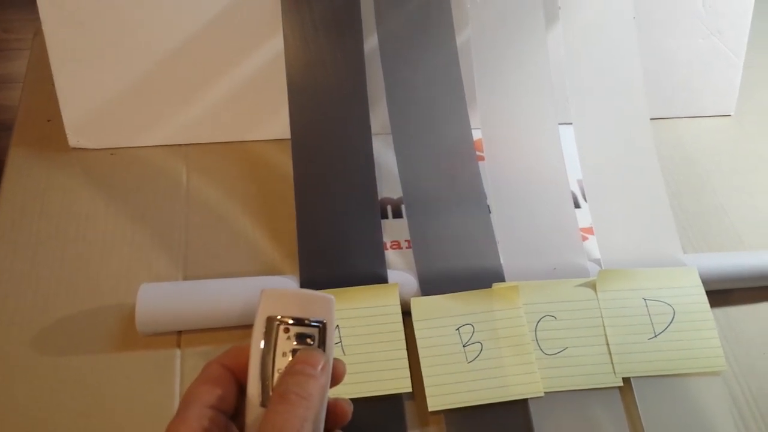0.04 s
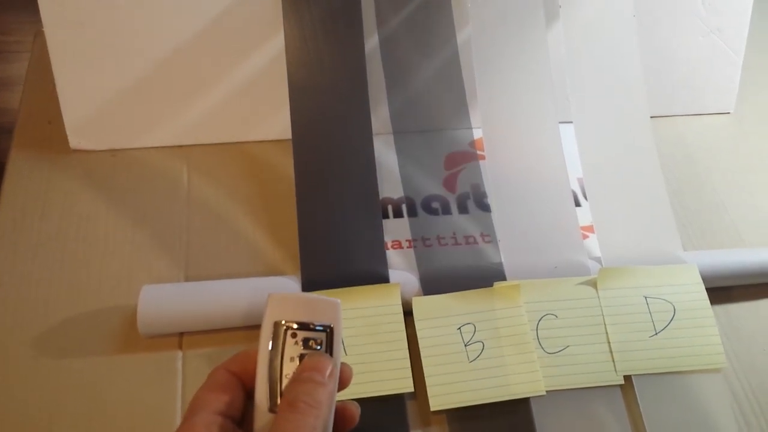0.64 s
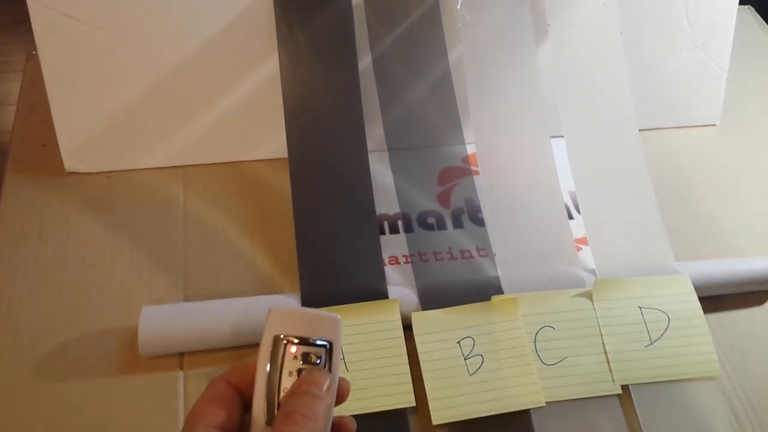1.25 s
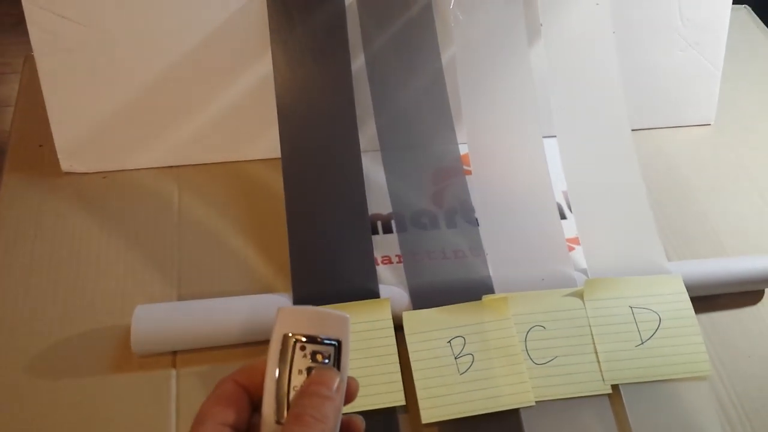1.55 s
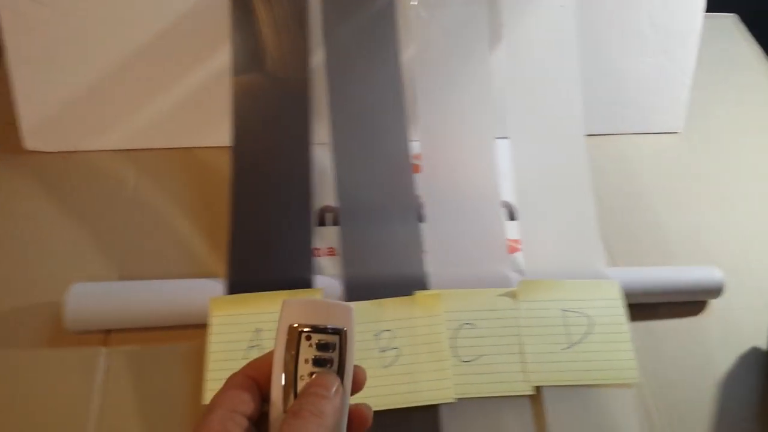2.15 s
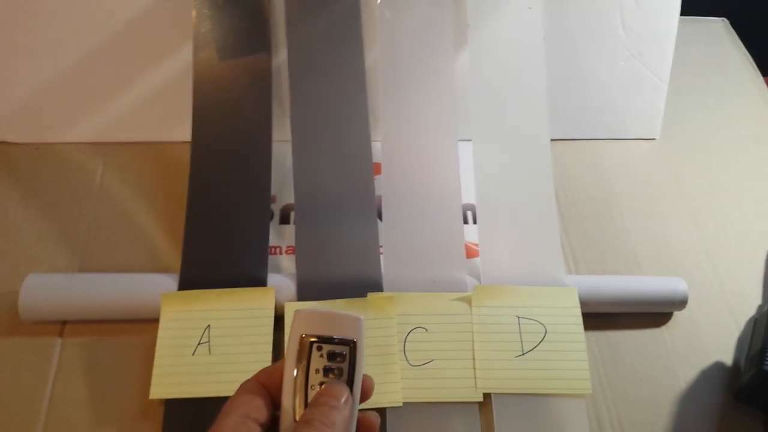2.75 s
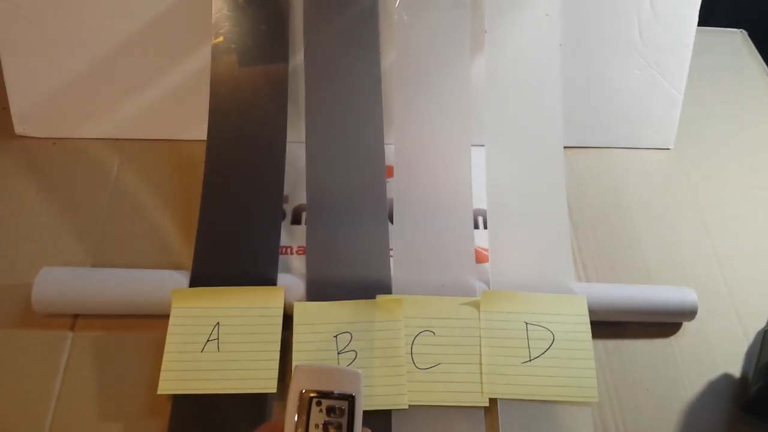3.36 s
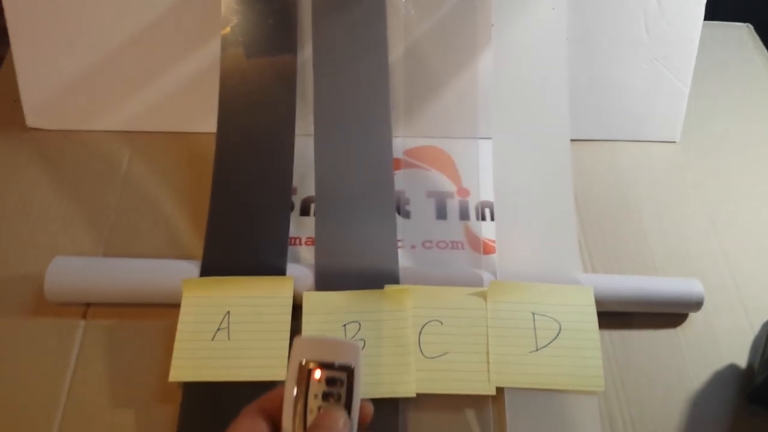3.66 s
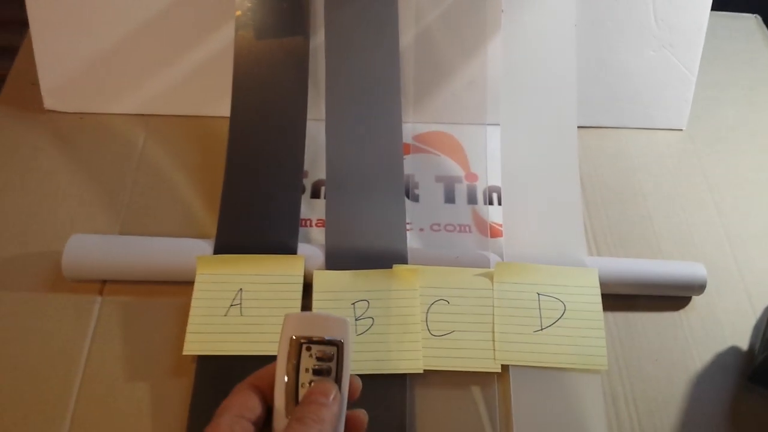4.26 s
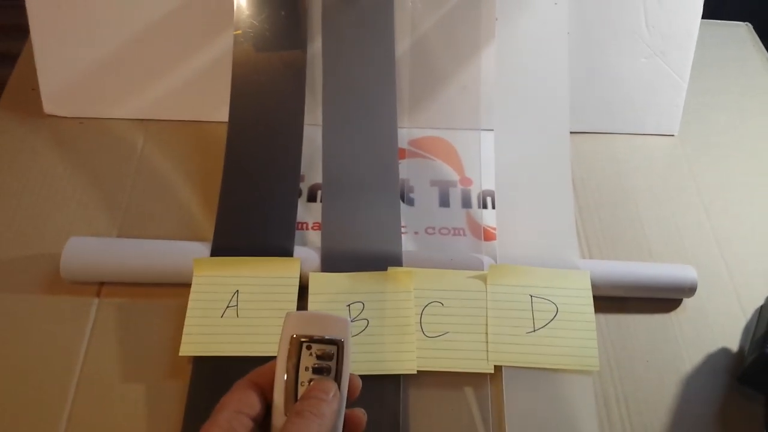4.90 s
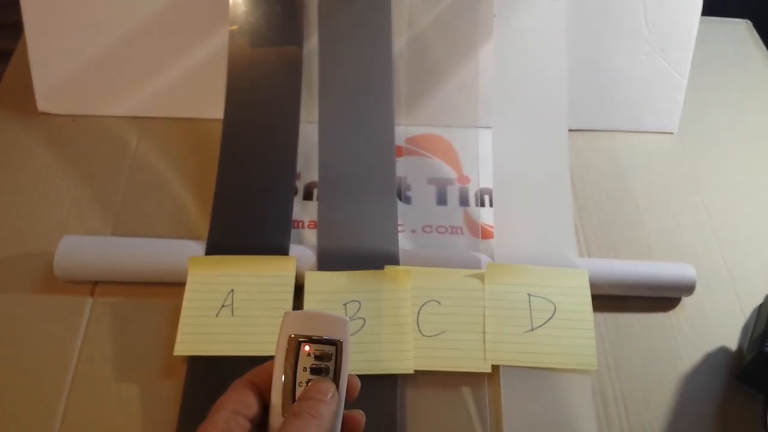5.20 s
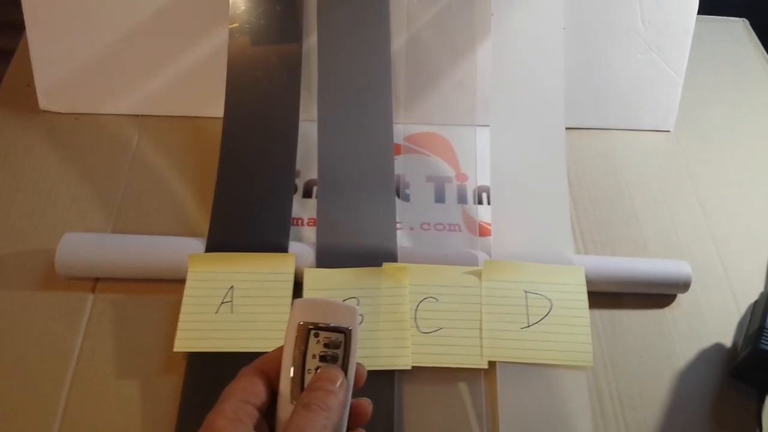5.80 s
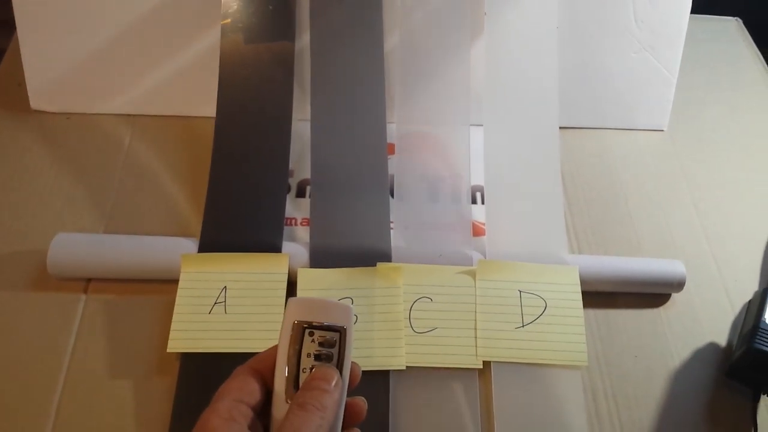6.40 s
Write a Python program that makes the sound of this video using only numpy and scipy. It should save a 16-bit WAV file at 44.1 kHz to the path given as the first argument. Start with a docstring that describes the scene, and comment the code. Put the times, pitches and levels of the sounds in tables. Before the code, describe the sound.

Four close plastic button clicks, each answered by a switching relay, with soft hand bumps and rubbing in a quiet room.

```python
"""Remote and relay in a quiet room

Close to the microphone, a thumb presses a small remote four times; its dome snaps and ticks back up.
About 60 ms after each press a relay closes or opens with a short chatter and rings in its case.
Hands tick, bump and rub on plastic; further off something hollow is nudged, and later a click echoes.
Behind it lie room noise and faint mains hum; a low tone near 300 Hz swells briefly after each throw."""
import sys
import numpy as np
from scipy import signal
from scipy.fft import rfft, irfft
from scipy.io import wavfile
from scipy.ndimage import uniform_filter1d

SR = 44100
rng = np.random.default_rng(int(sys.argv[2]) if len(sys.argv) > 2 else 0)


def dump(signal):
    """Clip the signal to [-1, 1] and save it as 16-bit WAV at the path in sys.argv[1]."""
    limited = np.clip(np.atleast_2d(signal).T, -1, 1)
    pcm = np.round(limited * 32767).astype(np.int16)
    wavfile.write(sys.argv[1], SR, pcm)


N = 288414
EVENT_SAMPLES = 32768
T = np.arange(EVENT_SAMPLES) / SR
HZ = np.fft.rfftfreq(EVENT_SAMPLES, 1 / SR)


# Presses, close to the microphone. Each row: start in seconds, level in dB, tilt in dB per octave.
PRESSES = [(.2030, 0.5, -1.2), (1.3347, 2.5, -0.8), (3.5249, -2, -2.5), (5.3135, -2, -2)]
# The remote's shell. Each row: frequency in Hz, left and right gain in dB.
SHELL_COLOUR = [(148.8, -23, -26), (494.7, -24, -27.5), (920, -22, -15.5), (1330, -3, -14),
                (1862, 2.5, -13), (2246, -4.5, -13.5), (3230, -17.5, -10), (4380, 3.5, 5), (5087, 5, -11),
                (6180, 12, 4.5), (7300, -7, -10), (9140, -11.5, -4), (10800, -21.5, -16.5),
                (14160, -28.5, -25)]

def button(level_db, tilt_db, snap_db=-5, rattle_db=-2, table_db=-17, room_db=-15):
    """The dome snaps once; the shell rattles, and the table and room throw it back."""
    shell_db = np.array([curve(SHELL_COLOUR, HZ, column) for column in (1, 2)])
    snap = (T == 0) * from_db(snap_db) + from_db(rattle_db) * chatter(0.00074, 0.013)
    echo = from_db(table_db) * chatter(0.0027, 0.06) + from_db(room_db) * room()
    echo = ring(echo, -0.51 * shell_db.mean(axis=0))  # over all directions the shell's peaks even out
    return radiate(snap, echo, shell_db + level_db + tilt_db * np.log2((HZ + 500) / 5000))


# One throw per press; the armature never lands twice alike. Each row: level in dB, tilt in dB per
# octave, then Hz and relative dB for each of the ringing wall, a favoured band and a starved band.
THROWS = [(0.5, 1.5, 1425, 2.5, 4200, 11.5, 6600, -6), (1.5, 1.35, 1438, 12, 1400, 3, 5800, -11),
          (-0.5, 0.2, 5300, 5, 7200, 4, 8200, -7), (0, -0.43, 1230, 1, 513, 8.5, 1730, -5.5)]
# A sharp closing stroke, then a longer opening one. Each row: delay after the press, chatter rise
# and chatter t60 in seconds, swell of the background tones in dB.
STROKES = [(.061, .002, 0.012, 12.5), (.0592, 0.002, 0.074, 7.5)]
# The strokes' colour. Each row: frequency in Hz, closing and opening gain in dB.
STROKE_COLOUR = [(200, -2, -1), (520, -3, 0), (1100, -7.5, 1), (1800, -3, -1.5), (3500, 0, -2.5),
                 (6000, 0, -2), (8400, -0.5, -4.5), (13100, 4, -3)]
# The relay and its case. Each row: frequency and nominal width in Hz, left and right level in dB.
RELAY_MODES = [(470, 220, -9, -13.5), (1224, 100, 7.5, -3), (1440, 290, 6, -11), (1558, 390, 9.5, -2.5),
               (1795, 200, 7.5, -2.5), (2476, 51, 3.5, -1), (3010, 90, 0, -3.5), (3470, 310, -5.5, -2),
               (4217, 170, -0.5, -3), (4878, 240, 2.5, -3.5), (5394, 160, 12.5, -5.5),
               (5990, 180, 14, -4.5), (6240, 190, 8.5, -3.5), (6710, 350, 4, 10.5), (7750, 150, 9.5, -1),
               (7540, 240, 4, -5), (8240, 224, -2, 13.5), (8920, 340, 7, -2), (9000, 130, 1, 6.5),
               (9530, 1000, -6, -1.5), (10800, 400, -3, -10), (12030, 280, -12.5, -6.5),
               (12550, 180, -10, -1.5), (13100, 220, -4.5, -4.5), (13600, 300, -11.5, -9.5)]

def relay(stroke, level_db, tilt_db, wall_hz, wall_db, favoured_hz, favoured_db, starved_hz, starved_db):
    """The armature strikes and chatters; the modes ring, and one wall of the case sings on."""
    _, rise, t60, _ = STROKES[stroke]
    table_echo = ring(chatter(0.0058, 0.087), dull(8000) - 9)
    room_echo = ring(room(), dull(11500) - 4.5 + sides(1.5))
    landing_db = level_db + tilt_db * octaves(4000)
    landing_db += favoured_db * peak(favoured_hz, 0.14) + starved_db * peak(starved_hz, 0.14)
    colour_db = resonances(RELAY_MODES, floor_db=-16) + colour(STROKE_COLOUR, 1 + stroke) + landing_db
    strike = radiate(chatter(rise, t60) + table_echo, room_echo, colour_db)
    wall = np.sin(2 * np.pi * wall_hz * T) * envelope(rise=0.0024, t60=0.33)
    return strike + wall * from_db(wall_db - 55.5 + sides(16))


def throw_times():
    """Start in seconds and stroke of each throw: the relay closes (0) and opens (1) in turn."""
    return [(press[0] + STROKES[k % 2][0], k % 2) for k, press in enumerate(PRESSES)]


# The button comes back up. Each row: start in seconds, level in dB, tilt in dB per octave.
RELEASES = [(.3945, -9, -1.5), (1.5204, -9.5, -0.5), (3.7902, -13, -2), (5.5228, -23.5, 1.5)]
# Its tick, duller than the press. Each row: frequency in Hz, gain in dB.
RELEASE_COLOUR = [(200, -10), (600, -10), (1100, -2), (1700, 1), (3200, -13.5), (6000, -3), (8000, -12.5),
                  (13000, -20.5)]

def release(level_db, tilt_db):
    """The dome springs back under the thumb."""
    colour_db = colour(RELEASE_COLOUR) + level_db + tilt_db * octaves(1500)
    return contact(colour_db, t60=0.016, room_db=-12.5, pan_db=4)


# Plastic ticks in the hand, and at 4.215 s a click further off with much room echo. Each row: start in
# seconds, level in dB, ring in Hz, its half width in octaves, relative click and room levels in dB.
TICKS = [(.1546, -29, 1450, .3, -33.5, -6), (1.2652, -33, 1390, .4, -14, 3),
         (1.8317, -19.5, 1100, 0.33, -23, -2), (1.8554, -29.5, 3000, 1.34, -27, -6.5),
         (1.8671, -21.5, 1500, 0.52, -25, -22), (3.7215, -18, 6000, 0.16, -19, -6),
         (3.8418, -14.5, 6500, 0.15, -22.5, -11), (3.8500, -30.5, 2120, 0.83, -18, -1),
         (4.2150, -17, 5630, 0.27, -11.5, 5.5), (4.2813, -10.5, 3000, 0.3, -30, -16),
         (5.2897, -19, 1505, 0.29, -25, 0)]

def tick(level_db, ring_hz, half_width, click_db, room_db):
    """A tick with one broad resonance over a faint even click."""
    colour_db = level_db + 20 * np.log10(peak(ring_hz, half_width) + from_db(click_db))
    return contact(colour_db, t60=0.012, room_db=room_db, pan_db=2.5)


# Bumps of the hand on the camera, and at 4.215 s the dull low body of the far click.
# Each row: start in seconds, knock and boom levels in dB.
BUMPS = [(1.6362, -6, 6), (1.7980, -39, -5.5), (2.2264, -15.5, -43), (2.3767, -4, -9.5), (3.9834, -11, -24),
         (4.2150, -16.5, -29)]
# The dull knock. Each row: frequency in Hz, gain in dB.
KNOCK_COLOUR = [(200, -1.5), (550, -6), (1500, -24.5), (3000, -35), (6000, -29), (11000, -44)]

def bump(knock_db, boom_db, boom_hz=152.6):
    """A short dull knock and the longer, low boom of the body that was hit."""
    boom = contact(boom_db + 20 * np.log10(peak(boom_hz, 0.53)), t60=0.23, room_db=-14, pan_db=1)
    knock = contact(colour(KNOCK_COLOUR) + knock_db, t60=0.033, room_db=-16.5, pan_db=3)
    return boom + knock


# Skin slides over plastic twice; the last row is just a faint, soft rustle that dies away.
# Each row: start, rise and t60 in seconds, level in dB.
RUSTLES = [(1.642, 0.0035, 0.89, -19), (2.74, 0.15, 1.14, -24), (5.54, .06, 0.76, -26)]
# Their soft colour. Each row: frequency in Hz, gain in dB.
RUSTLE_COLOUR = [(200, 1), (600, 2.5), (1600, 0), (2900, -8.5), (6000, -2.5), (11000, -12)]

def rustle(rise, t60, level_db):
    """A long run of tiny contacts that dies away."""
    return contact(colour(RUSTLE_COLOUR) + level_db, t60=t60, room_db=-8.5, pan_db=2, rise=rise)


# A nudge, further from the microphone. Each row: start in seconds, level in dB.
NUDGES = [(2.7013, -4)]
# The hollow object. Each row: frequency and nominal width in Hz, left and right level in dB.
HOLLOW_MODES = [(320, 63, -7, -10), (1490, 360, -11, -20), (1840, 140, -7.5, -15), (2920, 200, -22, -26),
                (3630, 500, -20, -37), (6100, 400, -19.5, -33)]

def nudge(level_db, room_db=6):
    """A far knock on something hollow, heard mostly through the room."""
    blow = chatter(0.00083, 0.0073) + from_db(room_db) * room()
    return ring(blow, resonances(HOLLOW_MODES, floor_db=-29) + level_db + dull(7000))


# Mains hum, faint and a little to the left. Each row: frequency in Hz, resting level in dB.
HUM_TONES = [(120, -88.5), (300, -76.5), (2100, -95)]

def hum(waver_db=3, swell_peak_s=0.084):
    """Faint tones, the strongest at 300 Hz, waver a little and swell briefly after each throw."""
    t = np.arange(N) / SR
    tones = swell_db = 0
    for hz, db in HUM_TONES:
        amplitude = np.sqrt(2) * from_db(db + waver_db * drift(1.2))
        tones += amplitude * np.sin(2 * np.pi * hz * t + 0.48 * drift(8.87))
    for start, stroke in throw_times():
        age = np.maximum(t - start, 0) / swell_peak_s
        swell_db += STROKES[stroke][-1] * (age * np.exp(1 - age)) ** 2
    return tones * from_db(sides(2) + swell_db)


# Room noise, resonant near 150 and 300 Hz. Each row: frequency in Hz, relative level in dB.
AIR_COLOUR = [(15, -44), (30, -14), (85, -9), (125, -6), (165, -5), (195, -16.5), (260, -12), (305, -9.5),
              (380, -15.5), (573, -19), (2130, -25), (2630, -27), (11800, -27), (15000, -30.5)]
# How alike it is at the two microphones. Each row: frequency in Hz, correlation from -1 to 1.
AIR_LIKENESS = [(60, 0.43), (180, 0.93), (550, 0.45), (1650, -0.13), (4970, 0.02), (15000, -0.08)]
# Its balance. Each row: frequency in Hz, left minus right in dB.
AIR_BALANCE = [(60, 1), (240, 1.5), (950, 3.5), (3770, 0), (15000, -2.0)]
# Its swells and dips below the treble. Each row: centre and half length in seconds, change in dB.
AIR_SWELLS = [(1.5, .6, 3), (2.8, .25, 3.5), (3.293, .2, -1), (4.0, .2, 3.5), (5.35, .5, 6.5)]

def air(level_db=-68, lull_db=-0.9, swell_below_hz=2200):
    """Low room noise swells and sinks slowly under a smooth hiss."""
    t = np.arange(N) / SR
    hz = np.fft.rfftfreq(N, 1 / SR)
    spectrum = stereo_spectrum(N, curve(AIR_LIKENESS, hz))
    colour_db = curve(AIR_COLOUR, hz) + sides(curve(AIR_BALANCE, hz))
    noise = unit_rms(irfft(spectrum * from_db(colour_db), N))
    low = irfft(rfft(noise) / (1 + (hz / swell_below_hz) ** 4), N)
    swell_db = lull_db + 0.5 * drift(6)
    for centre, half_length, db in AIR_SWELLS:
        swell_db += db * np.exp(-((t - centre) / half_length) ** 2)
    return from_db(level_db) * (noise + low * (from_db(swell_db) - 1))


# The room's tail, longest in the bass. Each row: frequency in Hz, t60 in seconds, relative level in dB.
ROOM_TAIL = [(150, 1, 1), (340, 0.74, 8), (514, 0.48, 6), (910, 0.39, 3), (1530, 0.39, -1.5),
             (3000, 0.27, 5), (6000, 0.36, 4), (9700, 0.3, -2), (13100, 0.44, -1.5)]

def room(rise=0.0055):
    """Dense reflections that build up in a few ms; each band dies at its own speed."""
    hz, t, bands = signal.stft(close_noise(), SR, nperseg=256)
    t60 = curve(ROOM_TAIL, hz)[:, None]
    level_db = curve(ROOM_TAIL, hz, column=2)[:, None]
    equal_energy = np.sqrt(2 * np.log(1000) / (t60 * SR))
    _, tail = signal.istft(bands * from_db(level_db - 60 * t / t60) * equal_energy, SR, nperseg=256)
    return tail[:, :EVENT_SAMPLES] * (1 - np.exp(-T / rise))


def contact(colour_db, t60, room_db, pan_db, rise=0.00024):
    """A touch and its echo in the room."""
    direct = chatter(rise, t60) * from_db(sides(pan_db))
    echo = room() * from_db(room_db + sides(0.86 * pan_db))
    return ring(direct + echo, colour_db)


def chatter(rise, t60):
    """A quick run of tiny contacts, evened out to a flat spectrum."""
    spectrum = rfft(close_noise() * envelope(rise, t60))
    smooth_power = uniform_filter1d(abs(spectrum) ** 2, size=200, axis=1)
    return irfft(spectrum * minimum_phase(-10 * np.log10(smooth_power + 1e-12)))


def envelope(rise, t60):
    """A rounded onset and a decay of 60 dB in t60 seconds."""
    return (1 - np.exp(-T / rise)) * from_db(-60 * T / t60)


def close_noise(mono_hz=650):
    """Noise at two close microphones: long waves reach both alike."""
    return irfft(stereo_spectrum(EVENT_SAMPLES, likeness=1 / (1 + (HZ / mono_hz) ** 2)))


def stereo_spectrum(samples, likeness):
    """Left and right white noise spectra with the given correlation."""
    left, other = rfft(rng.standard_normal((2, samples)))
    return np.array([left, likeness * left + np.sqrt(1 - likeness ** 2) * other])


def drift(rate_hz):
    """A slow random wander with an rms of one."""
    hz = np.fft.rfftfreq(N, 1 / SR)
    return unit_rms(irfft(rfft(rng.standard_normal(N)) * np.exp(-(hz / rate_hz) ** 2), N))


def radiate(direct, echo, colour_db):
    """The direct sound has its own colour on each side; echoes come from all round and share one."""
    return ring(direct, colour_db) + ring(echo, colour_db.mean(axis=0))


def ring(blow, colour_db):
    """Sends a blow through a body of the given colour."""
    return irfft(rfft(blow) * minimum_phase(colour_db))


def minimum_phase(db):
    """A response with the given gain that rings only after the blow."""
    log_gain = np.log(from_db(np.maximum(db, -100)))
    mirrored = np.concatenate([log_gain, log_gain[..., -2:0:-1]], axis=-1)
    return np.exp(np.conj(signal.hilbert(mirrored)))[..., :len(HZ)]


def resonances(modes, floor_db):
    """A body's colour in dB for each side: its peaks over an even floor."""
    power = from_db(floor_db) ** 2
    for hz, width, left_db, right_db in modes:
        shape = 1 / (1 + ((HZ - hz) / (0.82 * width)) ** 2)
        power = power + (from_db([[left_db], [right_db]]) * shape) ** 2
    return 10 * np.log10(power)


def colour(points, column=1, bass_hz=115):
    """A table of gains as a colour in dB, falling away in the deep bass."""
    return curve(points, HZ, column) - 10 * np.log10(1 + (bass_hz / (HZ + 1)) ** 6)


def dull(corner_hz):
    """Soft surfaces swallow the treble: a colour in dB."""
    return -10 * np.log10(1 + (HZ / corner_hz) ** 4)


def peak(centre_hz, half_width):
    """One resonance as a gain, its half width in octaves."""
    return 1 / (1 + (octaves(centre_hz) / half_width) ** 2)


def octaves(centre_hz):
    """How far each frequency lies above a centre, in octaves."""
    return np.log2((HZ + 1) / centre_hz)


def curve(points, hz, column=1):
    """One column of a table, joined by straight lines over log frequency."""
    columns = np.transpose(points)
    return np.interp(np.log(hz + 1), np.log(columns[0] + 1), columns[column])


def sides(db):
    """A left-right difference as dB for each side."""
    return np.array([[0.5], [-0.5]]) * db


def from_db(db):
    """Decibels to gain."""
    return 10 ** (np.asarray(db) / 20)


def unit_rms(x):
    """Scales to an rms of one."""
    return x / np.sqrt(np.mean(x ** 2) + 1e-20)


def add(mix, start, sound):
    """Mixes a sound in at a start time in seconds."""
    part = mix[:, round(start * SR):][:, :EVENT_SAMPLES]
    part += sound[:, :part.shape[1]]


def scene():
    """Presses, relay throws and small noises over the room's air and hum."""
    mix = air() + hum()
    for (start, stroke), row in zip(throw_times(), THROWS):
        add(mix, start, relay(stroke, *row))
    for table, source in ((PRESSES, button), (RELEASES, release), (TICKS, tick),
                          (BUMPS, bump), (RUSTLES, rustle), (NUDGES, nudge)):
        for start, *row in table:
            add(mix, start, source(*row))
    return mix


def record(dry):
    """The recorder passes nothing much above 14750 Hz."""
    lowpass = signal.firwin(255, 14750, window=("kaiser", 9), fs=SR)
    return signal.oaconvolve(dry, lowpass[None], "same", axes=1)


dry = scene()
out = record(dry)
dump(out)
```